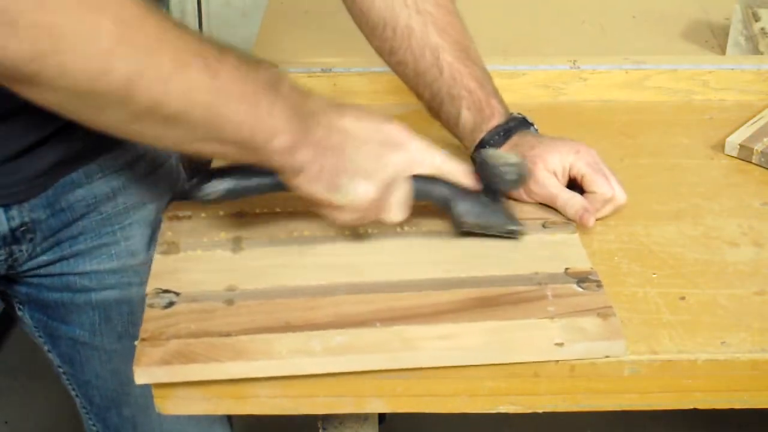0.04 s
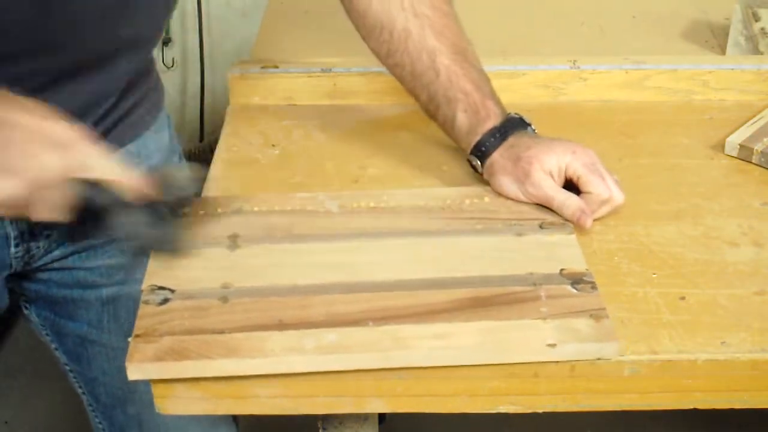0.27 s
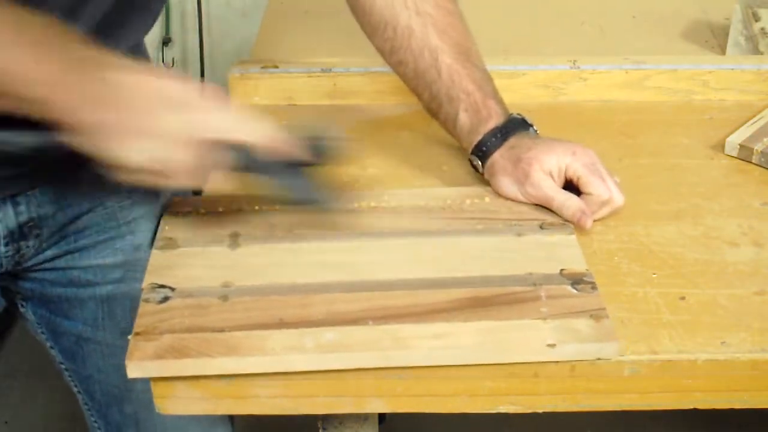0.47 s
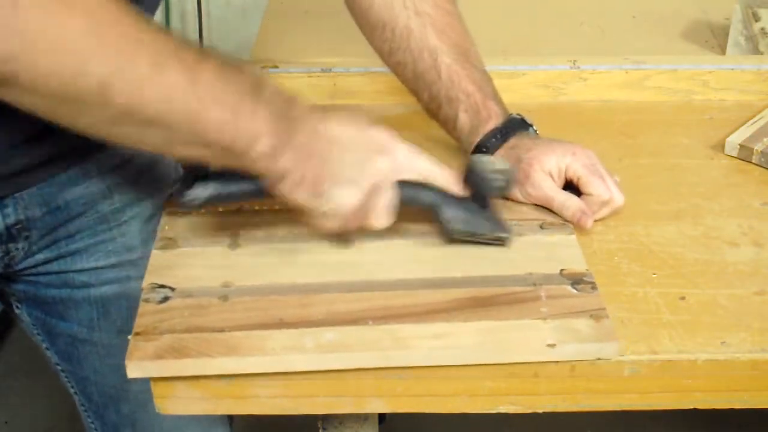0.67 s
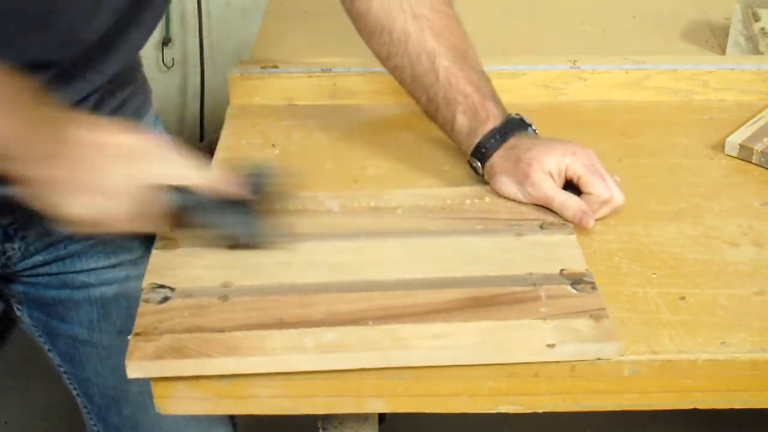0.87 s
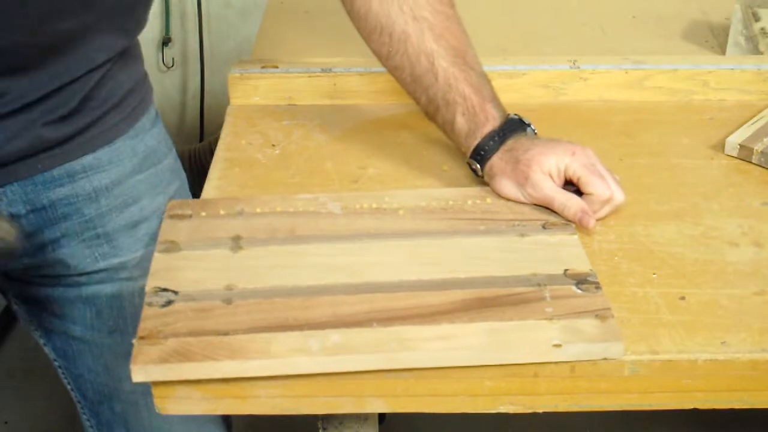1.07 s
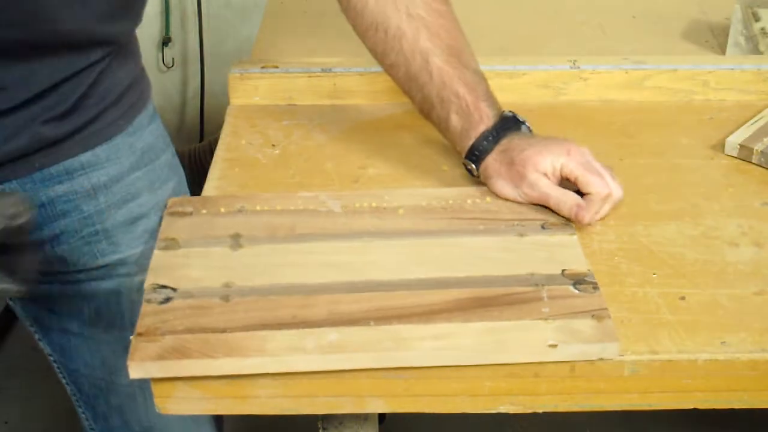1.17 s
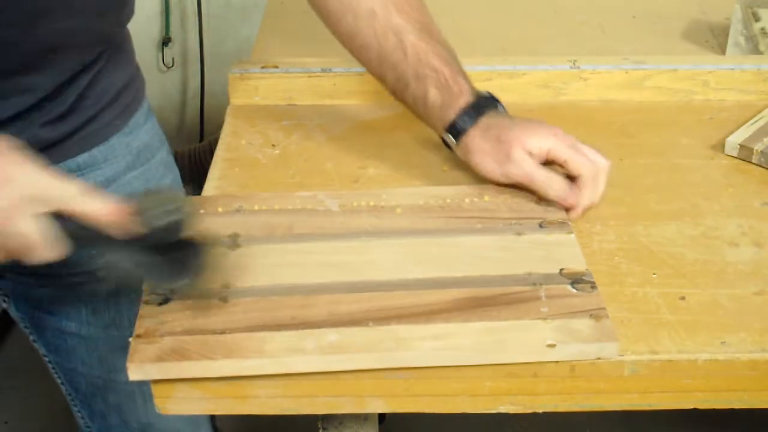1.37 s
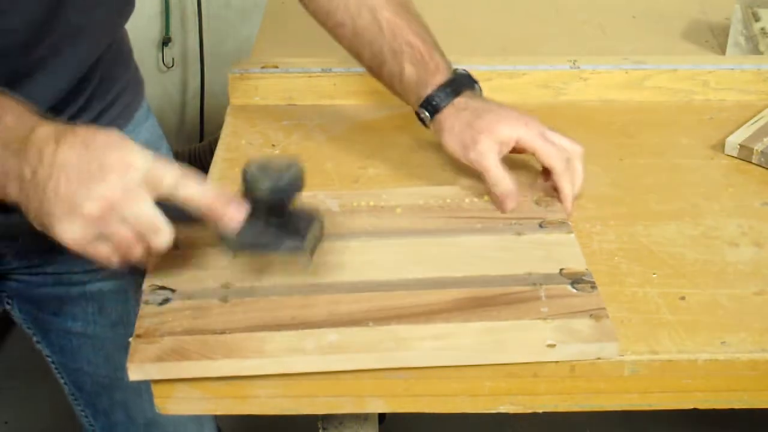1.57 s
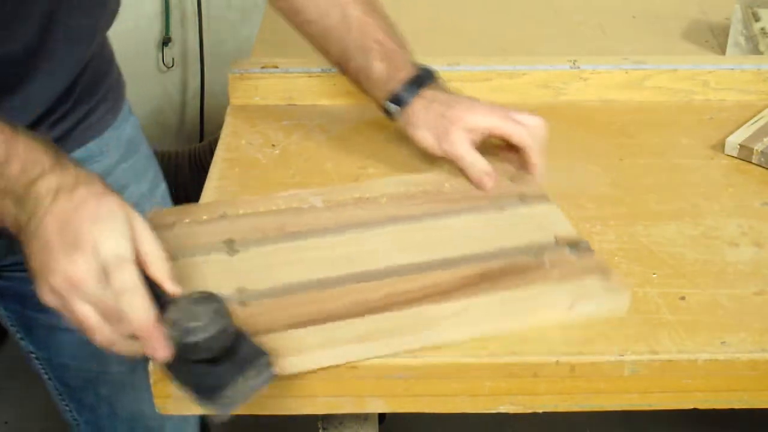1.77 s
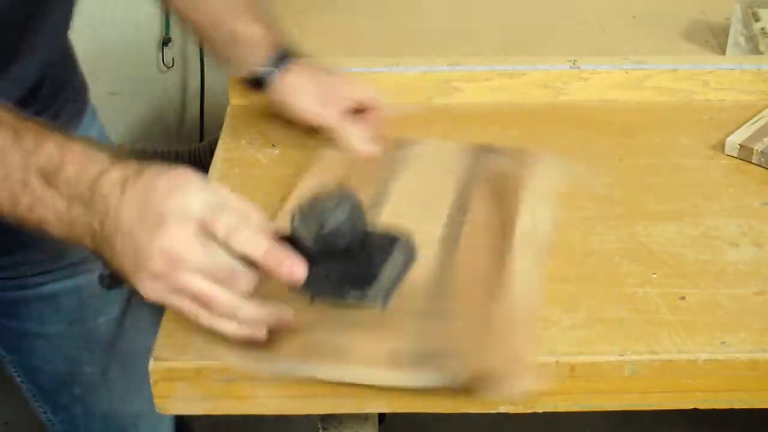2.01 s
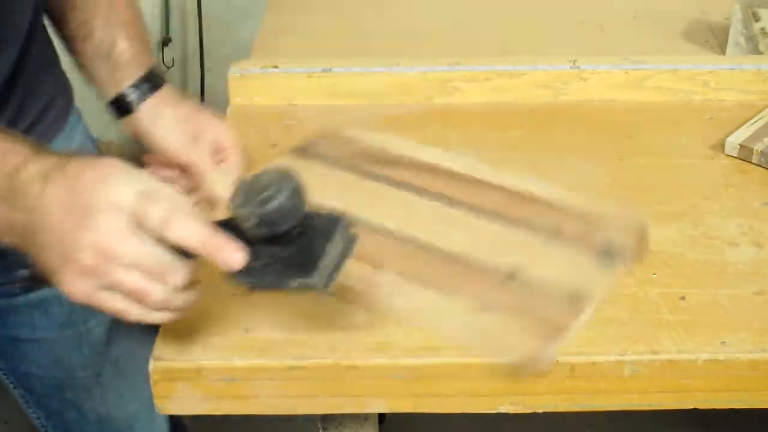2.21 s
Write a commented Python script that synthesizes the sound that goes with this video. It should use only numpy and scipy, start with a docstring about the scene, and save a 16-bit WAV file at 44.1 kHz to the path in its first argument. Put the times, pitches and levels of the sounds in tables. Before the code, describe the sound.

A steel hand scraper rasps along a wooden board, close by. It knocks down at about 0.2 seconds and makes a harsh, chattering pull with short high squeaks until 0.45. Another knock at 0.8 starts a lighter scrape, which bites sharply with squeaks around 1.1 seconds. Each stroke rings briefly in the workshop. A faint, steady fan hum runs throughout and is left alone afterwards.

```python
"""Hand scraper on a wooden board

A steel scraper is pulled twice along a board on a workbench. The blade knocks down, catches with short
squeaks, then tears fibres as it sticks and slips. The first pull is hard and chatters; the second is
light until it bites at the end. The workshop rings briefly, a fan hums, and a limiter holds the peaks."""
import sys
import numpy as np
from scipy import signal
from scipy.fft import rfft, irfft, next_fast_len
from scipy.io import wavfile
from scipy.ndimage import uniform_filter1d, minimum_filter1d, map_coordinates

SR = 44100
rng = np.random.default_rng(int(sys.argv[2]) if len(sys.argv) > 2 else 0)


def wav_record(signal):
    """Record a signal, one row per channel, as 16-bit PCM in the file named by sys.argv[1]."""
    frames = np.transpose(np.atleast_2d(signal))
    bounded = np.clip(frames, -1, 1)
    # unit amplitude maps onto the largest positive 16-bit level
    quanta = np.round(bounded * 32767).astype(np.int16)
    wavfile.write(sys.argv[1], SR, quanta)


N = 99225
T = np.arange(N) / SR
KNOCK_ATTACK_S = 0.00042

# The midrange rasp of tearing wood. Each row: frequency in Hz, relative level in dB.
RASP_SPECTRUM = [(100, -63), (900, -36.5), (1600, -31.5), (2000, -5.5), (2280, -4.5), (2500, -1.5),
                 (2900, -1), (3400, -0.5), (4150, -13.5), (4700, -10), (5200, -9), (5600, -19), (6100, -6),
                 (6600, -11.5), (7200, -24), (7800, -27), (9000, -43)]
# The bright sizzle of the blade's edge. Each row: frequency in Hz, relative level in dB.
EDGE_SPECTRUM = [(6500, -34), (7600, -26), (8100, -14), (8450, -5.5), (8750, -6), (9150, -10), (9650, 0.5),
                 (10150, 5), (10450, -1), (10750, 5), (11200, -6), (11650, -4.5), (12250, -18),
                 (13100, -24), (13750, -11), (14400, -18), (15700, -20)]


def pull(envelopes, chatter_depth, slips_per_s, attack_s=0.0072, release_s=0.016):
    """One stroke: the slipping blade tears fibres, shakes the board and rings."""
    # The woody body of the board. Each row: frequency in Hz, relative level in dB.
    board_spectrum = [(40, -36), (100, -8), (200, -31), (260, 0), (480, -7.5), (780, 1), (1000, -4),
                      (1220, -0.5), (1500, -7.5), (2200, -32)]
    times, *levels_db = np.transpose(envelopes)
    rasp_gain, body_gain, edge_gain, ring_gain = [from_db(np.interp(T, times, db)) for db in levels_db]
    contact = np.exp(np.minimum(T - times[0], 0) / attack_s - np.maximum(T - times[-1], 0) / release_s)
    friction = contact * stick_slip(chatter_depth, slips_per_s)
    tearing = friction * fibres()
    rasp = from_db(-0.5) * colour(tearing * rasp_gain, RASP_SPECTRUM)
    body = from_db(-3) * colour(tearing * body_gain, board_spectrum)
    edge = from_db(0.5) * colour(tearing * edge_gain, EDGE_SPECTRUM)
    return rasp + body + edge + friction * ring_gain * blade_ring() + contact * splinters()


def stick_slip(depth, slips_per_s, jitter=0.22, spread_db=3.3):
    """The blade grips and lets go, so the friction comes in uneven surges; depth runs from 0 to 1."""
    timing, strength = rng.standard_normal((900, 2)).T
    starts = np.cumsum(np.exp(jitter * timing)) / slips_per_s
    cycle = np.interp(T, starts, np.arange(len(starts)))
    surges = rms_one(np.sin(np.pi * cycle) ** 4 * from_db(spread_db * strength[cycle.astype(int)]))
    return rms_one(1 - depth + depth * surges)


def fibres(per_s=11000, spread_db=3.5):
    """Wood fibres tear in a dense stream of clicks of uneven size."""
    sizes = from_db(spread_db * np.minimum(rng.exponential(1, N), 4))
    clicks = sizes * rng.choice([-1, 1], N)
    return rms_one(clicks * (rng.random(N) < per_s / SR))


def blade_ring():
    """Friction keeps the blade's modes swinging at an even strength."""
    # The rubbed blade's modes. Each row: frequency in Hz, bandwidth in Hz, relative level in dB.
    blade_modes = [(2787, 176, 7), (6100, 530, -32), (10300, 380, -31), (11160, 170, -13)]
    ring = 0
    for hz, width_hz, db in blade_modes:
        swing = resonate(rng.standard_normal(N), hz, width_hz)
        phase = np.angle(signal.hilbert(swing))
        ring += from_db(db) * np.cos(phase)
    return rms_one(ring)


def splinters(per_s=30, decay_s=0.0012):
    """Now and then a splinter snaps off with a short bright crackle."""
    snaps = (rng.random(N) < per_s / SR) * rng.uniform(0.54, 1, N)
    bursts = signal.lfilter([1], [1, -np.exp(-1 / (decay_s * SR))], snaps + 1e-18)
    return from_db(-23) * colour(bursts * fibres(), EDGE_SPECTRUM)


def catches():
    """Single slips: the blade's lowest mode swells and dies within milliseconds, with some grit."""
    # The blade's squeaks. Each row: peak time in seconds, peak level in dB, half length in seconds,
    # pitch in Hz, grit relative to the peak in dB.
    squeaks = [(.1845,-18,0.0044,2740,-25), (.2195,-17,0.0023,2860,-19), (0.2238,-8.5,0.0025,2840,-15.5),
               (0.229,-13.5,0.0026,2600,-32), (.2338,-0.5,0.0014,2750,-19.5), (0.2628,-8.5,0.002,2870,-34),
               (0.312,-4.5,0.0011,3040,4), (0.34,-2.5,.001,3000,1.5), (0.3512,-3,0.0006,2740,-1),
               (.360,-3.5,0.0013,2740,0), (0.381,-1,0.0015,2880,-23), (0.383,0,.0026,2910,-15),
               (0.3956,0,0.0015,2960,-20), (0.4082,-0.5,0.0028,2710,-7), (.8235,-29,0.0014,2650,-23),
               (.829,-17.5,0.0021,2800,-11), (.9905,-15.5,0.0013,2870,-2.5), (1.075,-3,0.0018,2254,-16),
               (1.1025,-1,0.00054,2640,-20), (1.129,-12,0.0045,2720,-26)]
    tone, friction = 0, 0
    for peak_s, db, half_s, hz, grit_db in squeaks:
        swell = from_db(db) * np.exp(-np.minimum(((T - peak_s) / half_s) ** 2, 20))
        tone += swell * np.sin(2 * np.pi * hz * (T - peak_s))
        friction += from_db(grit_db) * swell
    grit = friction * fibres()
    return tone + colour(grit, RASP_SPECTRUM) + from_db(-1) * colour(grit, EDGE_SPECTRUM)


def knocks(contact_s=0.0034):
    """Short rough hits of steel on wood ring the scraper and thump the board."""
    # The hits. Each row: start in seconds, then relative levels in dB of ring, contact noise and thump.
    hits = [(.1755, -5, -22, -37), (.2710, -10, -19, -19.5), (.4515, -16, -16, -12),
            (.8180, -2, -15, -15.5), (.8815, -20, -26, -23), (.982, -17, -16.5, -35)]
    # The clack of the contact. Each row: frequency in Hz, relative level in dB.
    clack_spectrum = [(40, -58), (300, -35), (700, -7), (1100, -13), (1500, -16), (1950, -10), (2600, -0.5),
                      (3100, -11), (3700, -2), (4700, -8), (5700, -21), (6300, -15), (7300, -32),
                      (10000, -19), (12500, -24), (15500, -31)]
    # The steel's ring. Each row: frequency in Hz, relative level in dB, seconds to fall 60 dB.
    scraper_modes = [(1980, -11.5, 0.02), (2220, -9.5, 0.017), (2557, -4, 0.025), (2820, -11, 0.019),
                     (3460, -23, .014)]
    # The wood's thump. Each row: frequency in Hz, relative level in dB, seconds to fall 60 dB.
    board_modes = [(274, -20, 0.22), (484, -6.5, 0.044), (623, -10, 0.077), (780, -7.5, .04),
                   (904, -11.5, 0.2), (1186, -20, 0.058)]
    force, rings = 0, 0
    for start_s, ring_db, noise_db, thump_db in hits:
        attack = np.clip((T - start_s) / KNOCK_ATTACK_S, 0, 1)
        force += from_db(noise_db) * attack * np.exp(-np.abs(T - start_s) / contact_s)
        rings += from_db(ring_db) * struck(scraper_modes, start_s)
        rings += from_db(thump_db) * struck(board_modes, start_s)
    clack = from_db(0.5) * colour(force * rng.choice([-1, 1], N), clack_spectrum)
    return rings + clack


def struck(modes, start_s):
    """Modes ring out after a hit; neighbours start in opposite directions."""
    age = np.maximum(T - start_s, 0)
    ring = 0
    for k, (hz, db, t60) in enumerate(modes):
        decay = from_db(db - np.minimum(60 * age / t60, 200))
        ring += (-1) ** k * decay * np.sin(2 * np.pi * hz * age)
    return ring * np.clip(age / KNOCK_ATTACK_S, 0, 1)


def workshop(sound, t60_s, treble_t60_s=0.37, onset_s=0.0066):
    """The room answers with near echoes, a diffuse tail that dies sooner on top, and lingering tones."""
    # Reflections off the bench and walls. Each row: delay in seconds, level in dB.
    echoes = [(.0042, -13), (.0075, -37), (.0105, -15.5)]
    # The tone of the reverb. Each row: frequency in Hz, gain in dB.
    reverb_eq = [(200, -5.5), (600, -7), (1500, -8), (2500, -17.5), (3400, -6.5), (5000, -5.5), (6500, -11),
                 (8500, -8), (10500, -15), (15000, -9)]
    # Narrow resonances of the workshop. Each row: frequency in Hz, relative level in dB.
    resonances = [(2146, -35), (2367, -29), (2594, -28), (2724, -18), (2829, -20.5), (2953, -43),
                  (3348, -23), (3599, -19)]
    noise = rng.standard_normal(N)
    lows = signal.sosfiltfilt(signal.butter(2, 6500, fs=SR, output="sos"), noise)
    tail = lows * from_db(-60 * T / t60_s) + (noise - lows) * from_db(-60 * T / treble_t60_s)
    tail *= 1 - np.exp(-(T / onset_s) ** 2)
    reverb = signal.fftconvolve(sound, tail / np.sqrt(np.sum(tail ** 2)))[:N]
    near = sum(from_db(db) * np.interp(T - delay_s, T, sound, left=0) for delay_s, db in echoes)
    lingering = sum(from_db(db) * resonate(sound, hz, width_hz=3.8) for hz, db in resonances)
    return near + colour(reverb, reverb_eq, keep_power=False) + from_db(-15.5) * lingering


def opening_tail(t60_s):
    """As the scene opens, the room still rings faintly with the rasp of an earlier pull."""
    return from_db(-34 - 60 * T / t60_s) * colour(rng.standard_normal(N), RASP_SPECTRUM)


def fan(waver=0.19):
    """A steady rush and hiss of air, with wavering motor and housing tones."""
    # The low rush of air. Each row: frequency in Hz, relative level in dB.
    rush_spectrum = [(15, -58), (25, -26), (53, -8.5), (86, -15), (134, -4), (248, -8.5), (262, -14),
                     (281, -6), (353, -4), (530, -5.5), (579, -4), (782, -11), (869, -7), (1070, -5),
                     (1700, -19), (2210, -52), (3740, -120)]
    # The airy hiss above it. Each row: frequency in Hz, relative level in dB.
    hiss_spectrum = [(1000, -28.5), (1700, -2.5), (1880, -3), (2050, -1.5), (2180, -2), (2480, -3),
                     (2780, -2), (3130, -1.5), (3370, 0), (4450, -7.5), (5760, -14), (6260, -12.5),
                     (6930, -16), (8260, -19.5), (10600, -17.5), (12300, -29), (15500, -30)]
    # Motor and housing tones. Each row: frequency in Hz, relative level in dB.
    hum_tones = [(59.5, -60), (121, -48.5), (150, -46), (179.5, -48.5), (290.7, -46.5), (355.6, -40.5),
                 (570.6, -46.5), (598, -44.5), (898, -40), (958, -47.5), (1045, -38), (1136, -45.5)]
    hum = 0
    for hz, db in hum_tones:
        level = from_db(db) * (1 + waver * drift(7.13))
        phase = 2 * np.pi * (hz * T + rng.random()) + waver * drift(5.85)
        hum += level * np.sqrt(2) * np.sin(phase)
    rush = from_db(-31.5) * colour(rng.standard_normal(N), rush_spectrum)
    hiss = from_db(-38) * colour(rng.standard_normal(N), hiss_spectrum)
    return rush + hiss + from_db(-2.5) * hum


def from_db(db):
    """Decibels to gain."""
    return 10 ** (np.asarray(db) / 20)


def rms_one(x):
    """Scale to an rms of 1."""
    return x / np.sqrt(np.mean(x ** 2) + 1e-20)


def colour(x, points, keep_power=True):
    """Minimum-phase EQ through (Hz, dB) points; keep_power holds white noise at the same power."""
    size = 2 * next_fast_len(N)
    hz, db = np.transpose(points)
    bins_hz = np.linspace(1, SR / 2, size // 2 + 1)
    gain = from_db(np.interp(np.log(bins_hz), np.log(hz), db))
    cepstrum = irfft(np.log(rms_one(gain) if keep_power else gain))
    cepstrum[1:size // 2] *= 2  # folded forward, so nothing rings ahead of a click
    cepstrum[size // 2 + 1:] = 0
    return irfft(rfft(x, size) * np.exp(rfft(cepstrum)))[:N]


def resonate(x, hz, width_hz):
    """One resonance that keeps the power of white noise."""
    radius = np.exp(-np.pi * width_hz / SR)
    feedback = [1, -2 * radius * np.cos(2 * np.pi * hz / SR), radius ** 2]
    return np.sqrt((1 - radius ** 2) / 2) * signal.lfilter([1, 0, -1], feedback, x + 1e-18)


def drift(knots_per_s):
    """A smooth random wander with a spread of about 1."""
    return map_coordinates(rng.standard_normal(1024), [T * knots_per_s], mode="wrap")


def scene(room_t60_s=0.73, lowest_hz=189):
    """Two pulls with their squeaks and knocks, in the workshop, over the fan."""
    # The hard pull's envelopes. Each row: time in seconds, then relative levels in dB of rasp,
    # board body, edge sizzle and blade ring.
    hard_pull = [(.239,-23,-41,-28,-19), (.251,-23,-42,-34,-26), (.259,-19.5,-34,-23.5,-31),
                 (.271,-18,-28,-23,-17), (.291,-19.5,-38,-19.5,-19), (.311,-17.5,-23,-23,-21),
                 (.357,-14.5,-21.5,-16.5,-14), (.384,-15.5,-19.5,-16.5,-14), (.403,-15,-31,-20,-12),
                 (.422,-7.5,-19,-17,-15), (.446,-9.5,-17.5,-16,-8), (.455,-11.5,-20.5,-27,-16.5)]
    # The light pull that bites at the end, with the same columns.
    light_pull = [(.850,-29,-36,-34,-46), (.866,-30,-34,-39,-40), (.886,-24,-30,-31,-37),
                  (.915,-26.5,-48,-37.5,-32.5), (1.03,-27.5,-34,-38,-33), (1.058,-24,-53,-41,-37),
                  (1.067,-18,-33,-17,-18), (1.076,-10,-20,-23,-15), (1.085,-30,-26,-37,-31),
                  (1.094,-8.5,-24.5,-13,-36), (1.110,-12,-22,-19.5,-18), (1.126,-23.5,-24,-35,-17)]
    scraper = pull(hard_pull, chatter_depth=0.48, slips_per_s=180)
    scraper += pull(light_pull, chatter_depth=0.19, slips_per_s=210)
    scraper += catches() + knocks()
    # The board is too small to radiate deep bass.
    scraper = signal.sosfilt(signal.butter(4, lowest_hz, "high", fs=SR, output="sos"), scraper)
    return (scraper + workshop(scraper, room_t60_s) + opening_tail(room_t60_s) + fan())[None]


def record(dry, ceiling=1.0, window_s=0.0007, cutoff_hz=15750):
    """A very fast limiter holds the peaks, then a steep low-pass trims the top."""
    window = int(window_s * SR)
    needed_gain = ceiling / np.maximum(np.abs(dry), ceiling)
    gain = uniform_filter1d(minimum_filter1d(needed_gain, window), window)
    low_pass = signal.firwin(801, cutoff_hz, fs=SR)
    return signal.fftconvolve(dry * gain, low_pass[None], mode="same")


dry = scene()
out = record(dry)
wav_record(out)
```